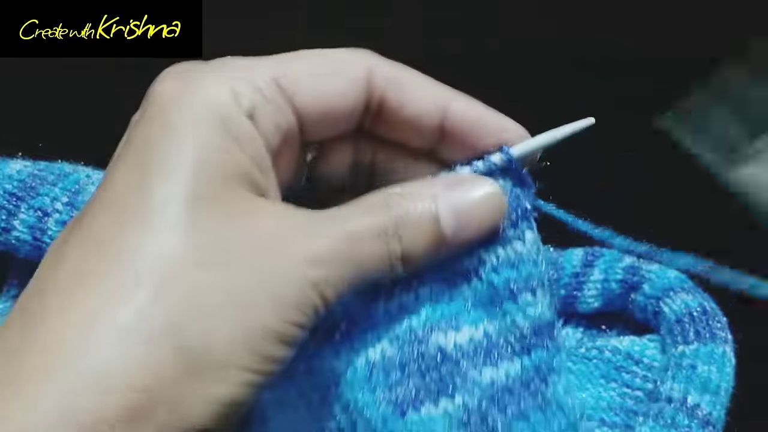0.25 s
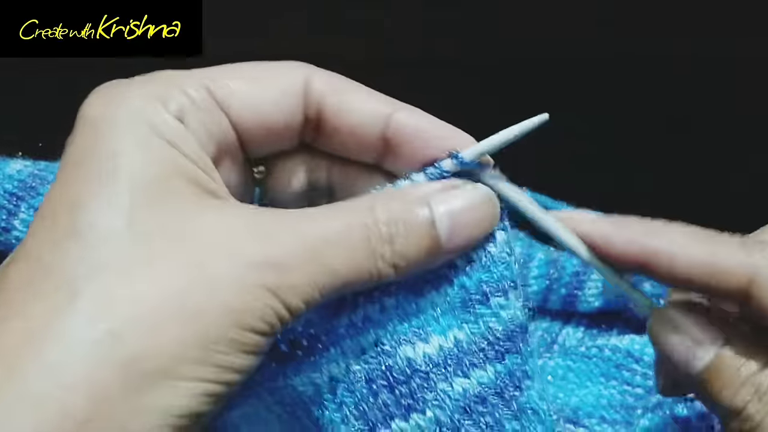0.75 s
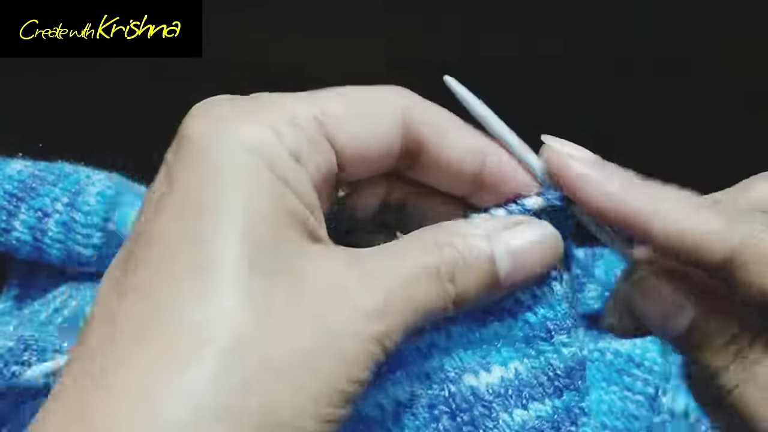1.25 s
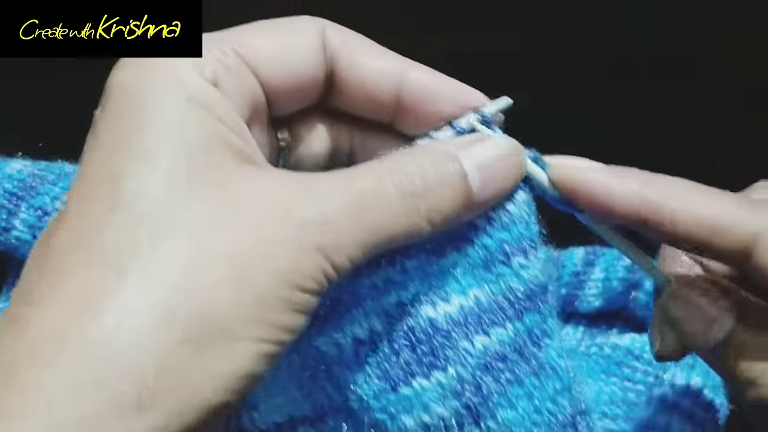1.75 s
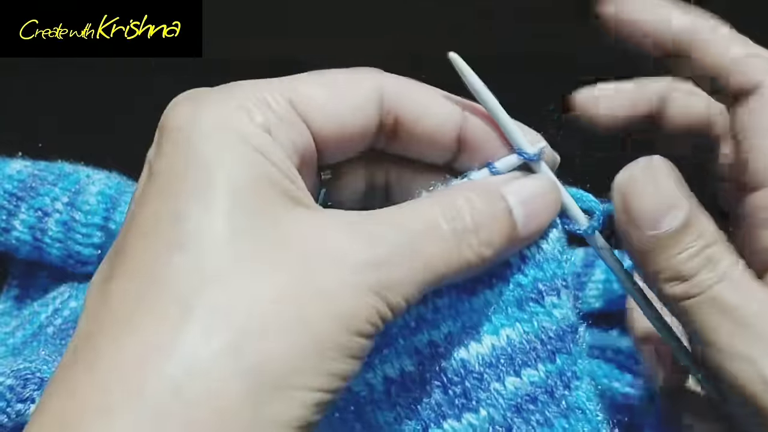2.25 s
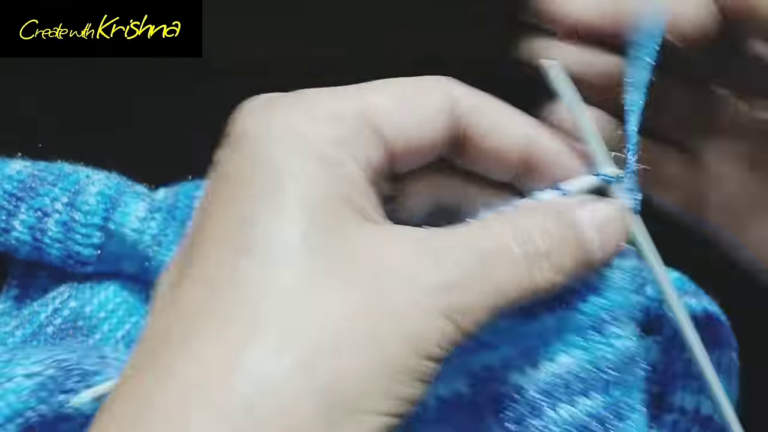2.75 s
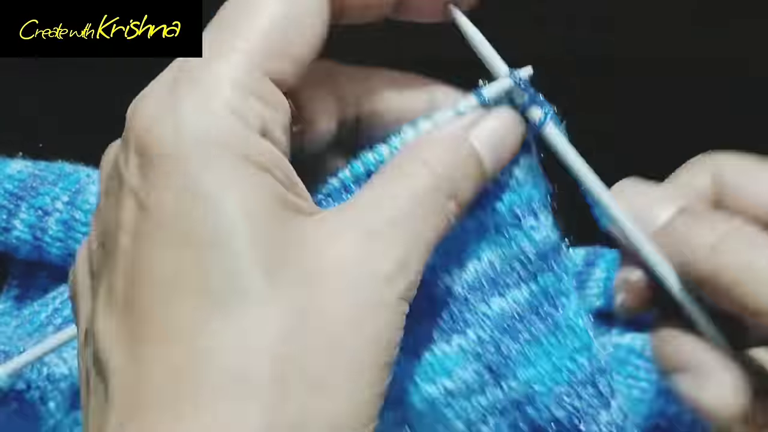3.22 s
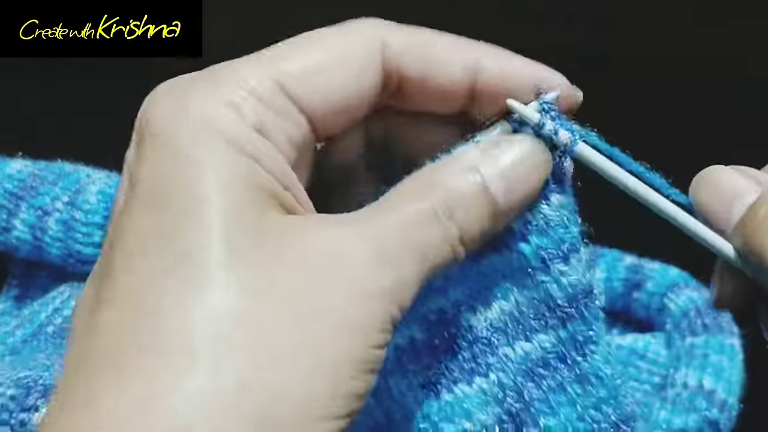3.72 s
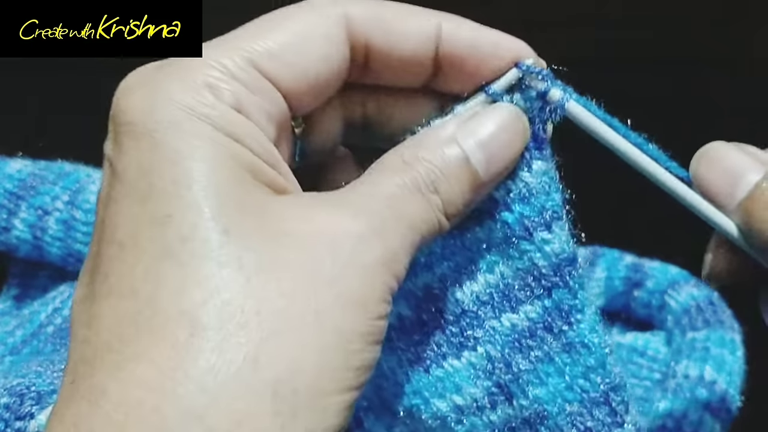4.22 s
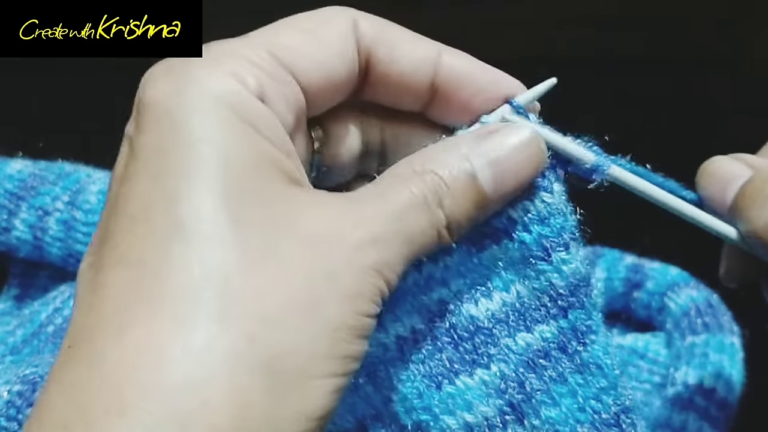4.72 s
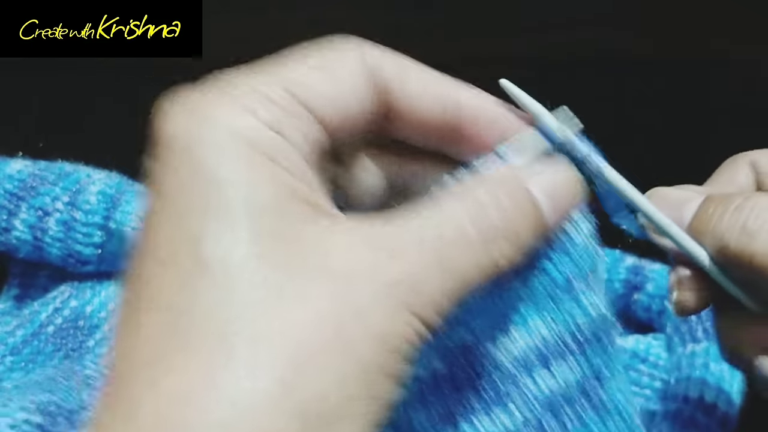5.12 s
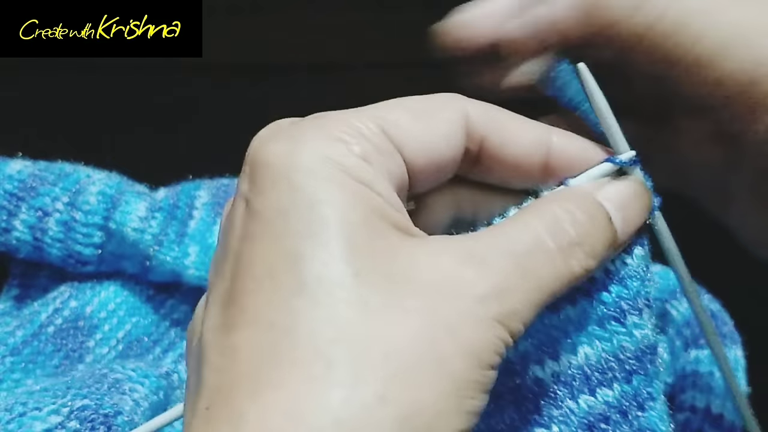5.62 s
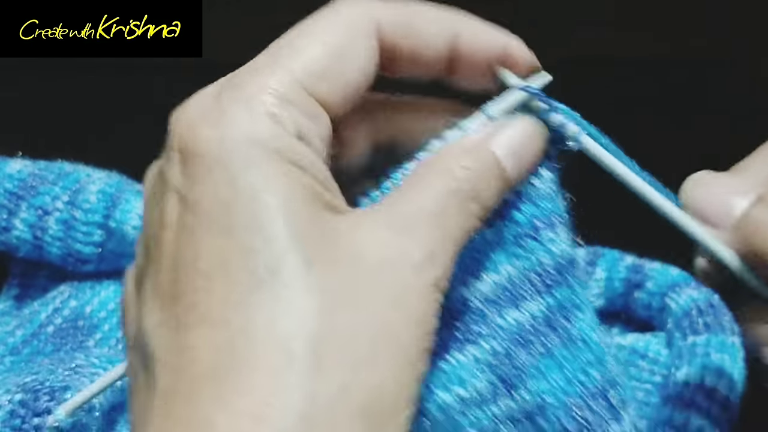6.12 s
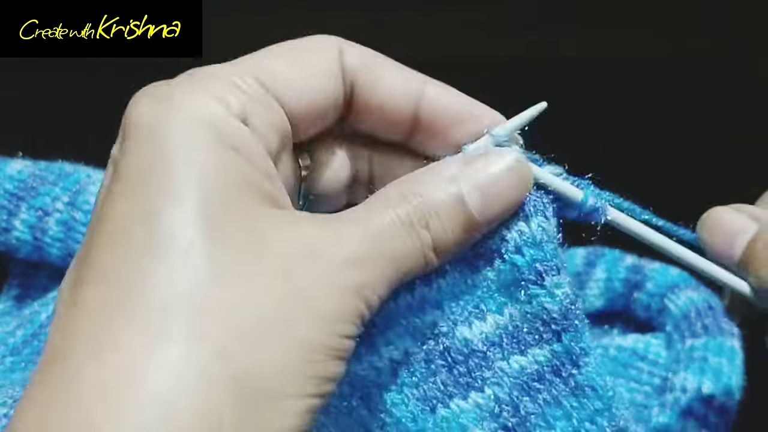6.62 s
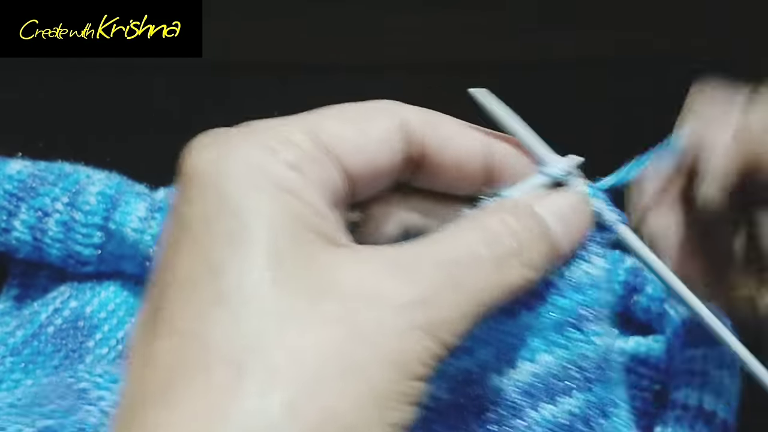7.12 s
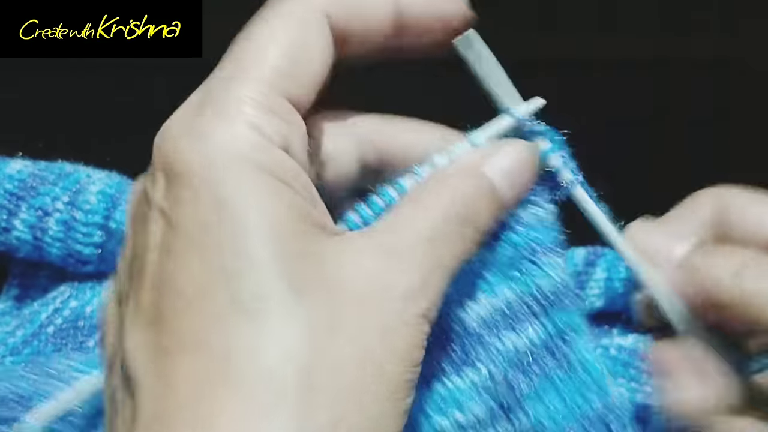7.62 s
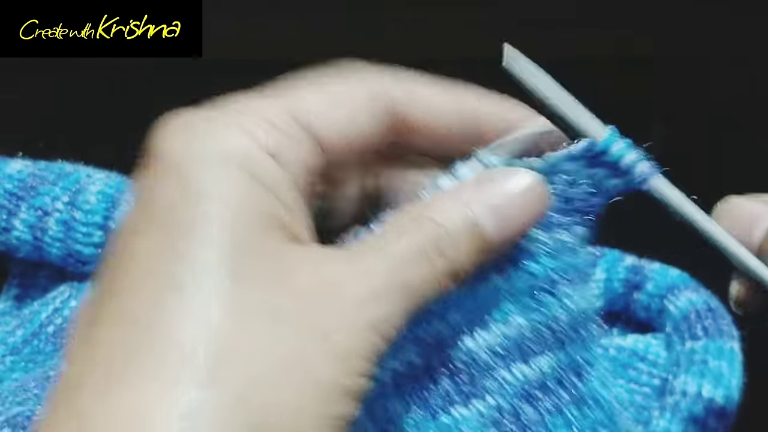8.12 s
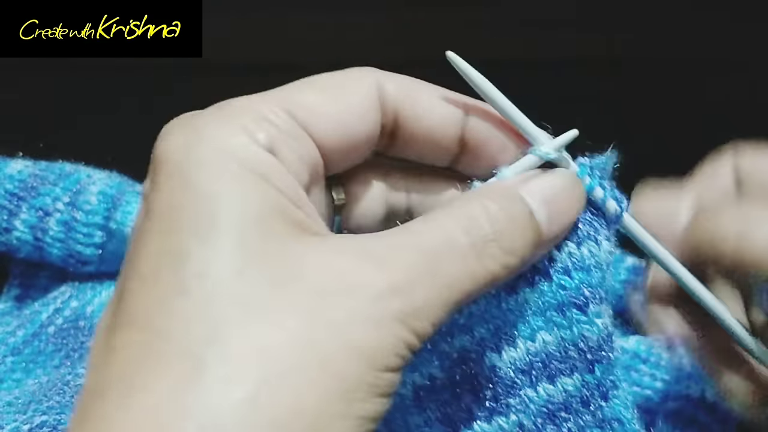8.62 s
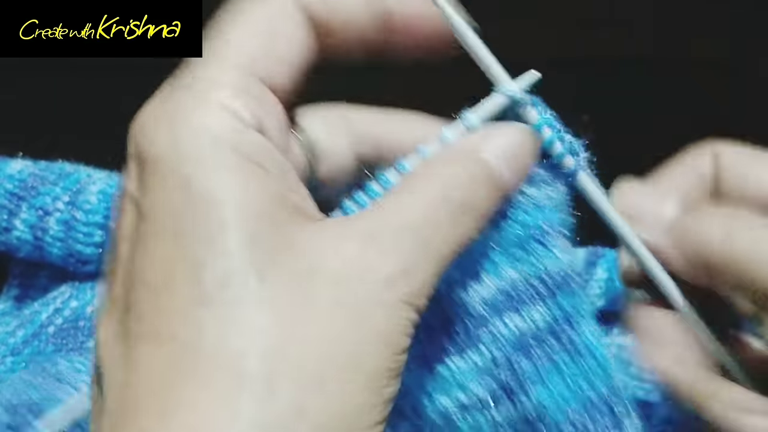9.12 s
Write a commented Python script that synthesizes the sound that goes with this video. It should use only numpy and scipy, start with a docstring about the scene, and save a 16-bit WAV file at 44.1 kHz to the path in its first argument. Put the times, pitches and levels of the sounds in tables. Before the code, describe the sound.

A steady, fluttering low motor hum fills a small room. Near the microphone and brighter on the left, knitting needles make tiny dry clicks and soft grainy swishes. One hard metallic knock rings and rattles briefly, followed by a short rising scrape. Afterwards come irregular ticks, a fainter catch and scrape, brisk slides and a rapid flurry of bright clicks.

```python
"""Metal knitting needles work slowly, close to the left port of a microphone in a small room.
The tips tick together (noise bursts and ringing tones) and slide through the yarn (grainy, coloured noise).
Once a needle's far end strikes something hard (fading tones, a crack, a thump), and it scrapes along it
(noise through sharp resonances, with a squeak).
Behind, a motor, probably a fan, hums and drones: wavering tones over coloured noise."""
import sys
import numpy as np
from scipy import signal
from scipy.fft import rfft, irfft, next_fast_len
from scipy.io import wavfile
from scipy.ndimage import map_coordinates

SR = 44100
rng = np.random.default_rng(int(sys.argv[2]) if len(sys.argv) > 2 else 0)


def waveform_to_disk(signal):
    """Save audio, clipped to [-1, 1], as 16-bit WAV at the path in sys.argv[1]."""
    frames = np.transpose(np.atleast_2d(signal))
    scaled = np.clip(frames, -1, 1) * 32767
    samples = np.round(scaled).astype(np.int16)
    wavfile.write(sys.argv[1], SR, samples)


N = 412776
TIME = np.arange(N) / SR  # seconds

# In all tables t60 is the time to fade by 60 dB; levels are settings before each layer's own gain.
# The motor's tones. Each row: pitch in Hz, level in dB, flutter per second, unsteady share from 0 to 1.
MOTOR_TONES = [(146.1, -64, 6, 0.08), (236.7, -71.5, 12, 0.7), (263.6, -69, 12, 1), (495, -80, 33, 0.94),
               (602.7, -70, 15, 0.6), (721, -79.5, 16, 0.48), (1210, -87, 35, 0.89)]
# The slowly wavering hum. Each row: time in seconds, level in dB.
HUM_LEVEL = [(0.0, -64), (0.36, -62), (0.49, -60), (1.09, -66), (1.41, -63), (2.34, -67), (2.61, -61.5),
             (3.18, -71), (3.6, -63), (3.86, -66), (4.14, -70), (4.3, -64.5), (5.68, -67.5), (6.13, -63),
             (6.28, -70), (6.78, -62.5), (7.43, -66.5), (7.82, -61), (8.03, -70), (8.63, -64.5),
             (8.94, -69), (9.36, -62)]
# The low rumble in the room. Each row: time in seconds, level in dB.
RUMBLE_LEVEL = [(0, -62), (.45, -56), (.72, -59), (1.05, -64), (1.6, -60), (3, -66), (3.9, -67.5),
                (4.5, -63), (5.3, -65.5), (6.5, -66.5), (7.65, -60.5), (8.2, -67), (9.3, -62.5)]
# Colours of the rumble, the drone and the hiss. Each row: frequency in Hz, strength in dB per Hz.
RUMBLE_COLOUR = [(12, -3), (30, -1), (54, -0.5), (66, 2.5), (80, -9.5), (120, -9.5), (220, -52.5)]
DRONE_COLOUR = [(90, -26.5), (150, -7.5), (175, -9.5), (200, -3.5), (220, -4), (280, -2.5), (315, -10),
                (420, -7.5), (530, -6), (660, -15), (800, -18.5), (1000, -21.5), (1400, -27), (2500, -58)]
HISS_COLOUR = [(500, -13), (1200, 0), (2000, 2), (5000, -0.5), (7000, -3), (9000, -9.5), (11000, -4.5),
               (13500, 0.5), (15400, -1.5), (15800, -24.5)]
# How alike the room noise is at both ports. Each row: frequency in Hz, likeness from 0 to 1.
LIKENESS = [(60, 0.83), (150, 0.47), (300, 0.71), (600, 0.035), (1200, 0.079), (4000, 0.04),
            (10000, 0.0503)]
# Needle sliding on needle and yarn. Each row: fastest moment in seconds, sizzle in dB, rasp in dB,
# length in seconds.
STROKES = [(.212, -63.5, -71.5, 0.11), (.717, -64, -76, .026), (0.797, -66, -71, 0.035),
           (0.967, -56, -66.5, 0.06), (1.185, -59, -66.5, 0.085), (1.223, -53.5, -64, 0.041),
           (1.816, -60, -72, .025), (2.102, -49.5, -66, 0.12), (2.666, -66, -73, 0.083),
           (2.818, -62, -74, 0.045), (3.1, -57, -64, 0.12), (3.295, -61.5, -73, 0.076),
           (3.543, -53, -67.5, 0.056), (4.023, -67, -76, .026), (4.572, -55, -67.5, 0.053),
           (4.9, -74, -77, 0.033), (5.072, -58, -66, .03), (5.141, -45, -63.5, 0.074),
           (5.948, -62, -68, 0.043), (6.14, -59.5, -74, 0.1), (6.897, -42.5, -64, 0.069),
           (7.031, -66, -75, .08), (7.602, -62, -66.5, 0.089), (7.692, -55, -76, .028),
           (7.72, -65, -72.5, 0.078), (8.514, -44.5, -69, 0.084), (8.614, -60.5, -66, 0.074),
           (9.131, -66, -74, 0.089), (9.21, -48, -69, 0.072), (9.317, -62, -70, 0.018)]
# Colours of the sizzle, the rasp and the loop dragging along the shaft.
# Each row: frequency in Hz, strength in dB per Hz.
SIZZLE_COLOUR = [(8800, -47.5), (9700, -18.5), (10700, -13.5), (11600, -7.5), (12500, -4), (13700, -3.5),
                 (14600, -2), (15400, -6.5), (15800, -33)]
RASP_COLOUR = [(900, -34), (2300, -4.5), (4000, -4), (6000, 0.5), (7400, -6), (8500, -2.5), (9500, -23)]
WOOL_COLOUR = [(1200, -23), (2000, -6.5), (2550, -1), (3200, -8), (5000, -8.5), (8000, -15), (10000, -28)]
# Tips touching. Each row: start in seconds, level in dB, body in dB relative to that level,
# t60 in seconds, note of the shaft at that grip in Hz.
TICKS = [(0.532, -43, -11, .012, 4300), (.602, -39.5, -9.5, 0.017, 4400), (.771, -56, -4, .015, 5400),
         (0.9346, -47, -8, 0.023, 7500), (.959, -48.5, -7, .012, 5500), (3.404, -61, -12, .01, 5800),
         (4.1348, -40.5, -12.5, .0093, 5800), (4.5271, -34.5, -26, 0.014, 5500), (4.712, -57, 2, .01, 2500),
         (4.7596, -35, -18.5, .0098, 6000), (5.0385, -32.5, -17, 0.011, 4400),
         (5.232, -62.5, 3, 0.016, 2540), (6.0628, -43, -15, 0.015, 7600), (6.081, -50, -18, .012, 5800),
         (6.092, -57, -18, .012, 5800), (6.149, -48, -16, .015, 5800), (6.6028, -38, -13, 0.0097, 5900),
         (6.859, -48, -16, .028, 6000), (7.598, -47, -19, .012, 5800), (7.603, -53, -16, .014, 5200),
         (7.626, -28.5, -27, 0.009, 6900), (7.635, -47, -22, .03, 5400), (7.6785, -34.5, -20.5, 0.02, 7760),
         (7.682, -44, -24, .012, 5200), (7.686, -46, -24, .012, 6400), (7.6889, -32, -31, 0.012, 5800),
         (7.6965, -44, -25, .012, 4400), (7.7, -41, -26, .01, 5800), (7.7943, -29, -17.5, 0.015, 5700),
         (8.349, -50.5, -7, 0.01, 5800), (8.4885, -41, -31, 0.05, 5800), (9.06, -55, -9, .025, 5800),
         (9.176, -45, -26, 0.04, 5800), (9.2453, -40, -24, 0.025, 5800), (9.346, -47, -12, .015, 5750)]
# Colours of a tick's bright top and its body. Each row: frequency in Hz, strength in dB per Hz.
TICK_TOP_COLOUR = [(8900, -26), (9800, -9.5), (10700, 0), (11800, 2), (13600, 11), (15200, 8), (16300, -9)]
TICK_BODY_COLOUR = [(500, -14), (1300, -1), (2200, -7), (2700, 3.5), (3500, -3.5), (4400, 2), (5200, 4),
                    (6000, 6), (7000, 6), (8000, 6), (9200, -6)]
# How much louder the tips are at the left port. Each row: frequency in Hz, difference in dB.
TIP_PAN = [(5000, 2), (8000, 0.5), (10000, 9), (12000, 18), (14000, 20.5)]
# Ringing tones of the struck needle. Each row: pitch in Hz, left level in dB, right level in dB,
# t60 in seconds.
NEEDLE_MODES = [(480, -44, -47, .08), (850, -46, -46, .04), (1630, -32, -32, .03), (1780, -33, -32, .03),
                (2380, -37, -35, .025), (2900, -32, -30, .028), (3634, -37, -43, .05), (4270, -52, -52, .1),
                (4620, -54, -54, .12), (5440, -42, -39, .13), (5480, -34, -29, .055), (5780, -36, -32, .05),
                (5850, -33, -33, .06), (5885, -37, -37, .13), (6148, -43, -45, .11), (6490, -37, -39, .09),
                (7208, -39, -39, .08), (8100, -33, -36, .05), (10330, -27, -43, .075),
                (11050, -31, -36, .05), (11180, -40, -48, .13), (11890, -20, -41, .06),
                (13540, -5.5, -33, .04), (13780, -21, -38, .015), (15200, -28, -40, .12)]
# Colour of the crack. Each row: frequency in Hz, strength in dB per Hz.
CRACK_COLOUR = [(50, -3), (200, -1), (450, -2), (850, -2.5), (1120, -4.5), (1600, 5), (2700, -2.5),
                (4300, -6.5), (6000, 3.5), (8000, -1.5), (9000, -5), (10500, 5.5), (12600, -2), (14000, 3),
                (15300, 5), (15900, -17)]
# Clusters of close tones in the needle's rattle. Each row: centre in Hz, width in Hz, level in dB.
RATTLE_CLUSTERS = [(1590, 350, -11.5), (2540, 520, -13), (3538, 300, -10), (4120, 180, -14),
                   (4780, 250, -9.5), (5590, 340, 5), (6536, 230, -3), (7190, 260, -4.5), (8070, 410, -3),
                   (10100, 490, -0.5), (11130, 280, 2), (12600, 360, 1), (13850, 340, -3),
                   (14950, 450, -0.5), (15500, 188, 4)]
# The furniture under the blow. Each row: pitch in Hz, level in dB, t60 in seconds.
FURNITURE_MODES = [(31, -44.5, .35), (52, -42, 0.24), (84, -48.5, 0.18), (177.3, -52.5, .13),
                   (216, -52.5, 0.12), (293.3, -51.5, 0.069)]
# The needle's end catching. Each row: start in seconds, level in dB, t60 in seconds,
# frequency in Hz above which the catch is dulled.
CATCHES = [(2.7695, -48, 0.043, 13000), (2.7832, -51, 0.1, 13000), (5.76, -48.5, .03, 1700),
           (5.7987, -54, 0.028, 2400)]
# Colour of a catch. Each row: frequency in Hz, strength in dB per Hz.
CATCH_COLOUR = [(1200, -2), (3000, -1), (8000, -0.5), (11000, 1), (15000, -1)]
# The needle's end skidding. Each row: start in seconds, length in seconds, level at the end in dB.
SCRAPES = [(2.844, 0.278, -59), (5.85, 0.097, -64.5)]
# Resonances of the skid. Each row: centre in Hz, width in Hz, level in dB.
SKID_RESONANCES = [(1280, 290, 5.5), (1620, 94, 6.5), (2470, 90, 9), (2850, 300, 7), (3180, 140, 0),
                   (3620, 380, -2), (5410, 110, 7), (5840, 150, 4), (6320, 120, 7), (7220, 140, 5),
                   (7450, 130, 5), (10860, 270, -10), (11890, 90, 11.5), (13540, 110, 11.5),
                   (15240, 120, 10)]
# How much louder the needle's end is at the left port. Each row: frequency in Hz, difference in dB.
SKID_PAN = [(5000, 0), (9000, 3.5), (14000, 11.5)]
# How long the room rings. Each row: frequency in Hz, t60 in seconds.
ROOM_FADE = [(100, 0.31), (1000, 0.18), (6000, 0.34), (14000, 0.26)]

HUM_HZ, HUM_DB = 100.5, 1  # pitch, dB over the hum table
BOOM_HZ, BOOM_DB, BOOM_FLUTTER = 96.8, -70, 9  # narrow boom beating with the hum; flutter per second
RISE_SHARE = 0.512  # part of a stroke spent speeding up
FOLLOW_S, FOLLOW_DB, FOLLOW_LENGTH_S = .14, -25.5, .11  # soft drag of the loop after each stroke
TIP_HZ, TIP_SPREAD = 13780, 0.017  # the tips' own ping, and its random share of change per touch
STRIKE_S = 2.4757  # the hard blow on the needle's end
SETTLE_S, PRESS_DB_PER_S, LIFT_S = 0.048, 21, 0.013  # a skid sets in, grows with pressing, lifts off
SQUEAK_HZ, SQUEAK_WIDTH_HZ, SQUEAK_DB = 2900, 440, -11.5  # dB over the skid's friction
SAG_HZ, SLOWING_S = 400, .045  # how far the squeak sinks, and over how long, as the skid slows
TOP_HZ = 16100  # band limit


def amp(db):
    """Turn decibels into gain."""
    return 10 ** (np.asarray(db) / 20)


def unit(x):
    """Scale x to an rms (average strength) of 1."""
    return x / np.sqrt(np.mean(x ** 2) + 1e-20)


def along(points, hz):
    """Read a value between (Hz, value) points, with pitch on a log axis."""
    f, v = np.transpose(points)
    return np.interp(np.log(hz + 1), np.log(f + 1), v)


def wobble(rate):
    """A smooth random curve with about `rate` random points a second."""
    knots = rng.standard_normal(int(N * rate / SR) + 4)
    steps = np.linspace(0, len(knots) - 1, 8 * len(knots))
    return unit(np.interp(TIME * rate, steps, map_coordinates(knots, [steps])))


def filtered(x, response):
    """Strengthen or weaken each frequency of x by response(hz)."""
    size = next_fast_len(N + 8192)
    spectrum = rfft(x, size) * response(np.fft.rfftfreq(size, 1 / SR))
    return irfft(spectrum, size)[..., :N]


def noise(colour):
    """Two unrelated coloured noises, together at rms 1."""
    white = rng.standard_normal((2, N))
    return unit(filtered(white, lambda hz: amp(along(colour, hz))))


def diffuse(colour):
    """Room noise: alike at both ports in the bass, nearly unrelated in the treble."""
    def mix(hz):
        turn = np.arccos(np.clip(along(LIKENESS, hz), -1, 1)) / 2
        return np.array([np.cos(turn), np.sin(turn)])

    mid, side = filtered(noise(colour), mix)
    return unit(np.array([mid + side, mid - side]))


def shaded(x, pan):
    """The right port faces away and loses mostly treble."""
    return filtered(x, lambda hz: np.array([np.ones_like(hz), amp(-along(pan, hz))]))


def swells(rows):
    """Envelope of rubbing strokes (s, dB, length): each swells and fades, 10 dB down at both ends."""
    power, t = 0, TIME[::16]
    for s, db, length in rows:
        away = np.abs(t - s) / (length * np.where(t < s, RISE_SHARE, 1 - RISE_SHARE))
        power = power + amp(db - 10 * np.minimum(away, 20) ** (3 / 2)) ** 2
    return np.interp(TIME, t, np.sqrt(power))


def burst(s, hold, t60):
    """Envelope of a contact: a quick rise at s, then fading from `hold` seconds after s."""
    start = int(s * SR)
    t = TIME[:min(SR // 2, N - start)]
    envelope = np.zeros(N)
    rise = np.minimum(t / 0.00058, 1)
    envelope[start:start + len(t)] = rise * amp(-60 * np.maximum(t - hold, 0) / t60)
    return envelope


def patchy(x, depth_db, width_hz, life):
    """Let patches of pitch come and go over `life` seconds, as when fingers shift their grip."""
    hz, t, z = signal.stft(x, SR, nperseg=256)
    knots = rng.standard_normal((int(hz[-1] / width_hz) + 2, int(t[-1] / life) + 2))
    grid = np.meshgrid(hz / width_hz, t / life, indexing="ij")
    field = map_coordinates(knots, grid, order=2)
    return unit(signal.istft(z * amp(depth_db * field), SR, nperseg=256)[1][..., :N])


def resonances(table):
    """Response of a set of (Hz, width Hz, dB) resonances, with deep valleys between them."""
    def response(f):
        return sum(amp(db) * (f * width) ** 2 / ((centre * centre - f * f) ** 2 + (f * width) ** 2)
                   for centre, width, db in table)
    return response


def room(x):
    """The walls' answer: x smeared by fading noise, each frequency dying at its own speed."""
    hz, t, z = signal.stft(rng.standard_normal((2, SR // 2)), SR, nperseg=256)
    fade = amp(-60 * t / along(ROOM_FADE, hz)[:, None])
    tail = signal.istft(z * fade, SR, nperseg=256)[1]
    return signal.fftconvolve(x[None], tail / np.linalg.norm(tail[0]), axes=1)[:, :N]


def motor(drone_db=-62, hiss_db=-70.5, spread=0.325):
    """Mains hum and fluttering tones over the low noise of moving air and a faint hiss."""
    tones = np.zeros((2, N))
    for hz, db, flutter, share in MOTOR_TONES:
        sway = 1 - share + share * (wobble(flutter) + 1j * wobble(flutter))
        # standing waves put the two ports out of step
        ports = spread * np.sqrt(hz / 300) * np.array([[1], [-1]])
        wave = np.exp(1j * (2 * np.pi * hz * TIME + ports))
        tones = tones + amp(db) * unit(np.real(sway * wave))
    boom_sway = wobble(BOOM_FLUTTER) + 1j * wobble(BOOM_FLUTTER)
    boom = unit(np.real(boom_sway * np.exp(2j * np.pi * BOOM_HZ * TIME)))
    hum_level = amp(HUM_DB + np.interp(TIME, *np.transpose(HUM_LEVEL)))
    hum = hum_level * unit(np.sin(2 * np.pi * HUM_HZ * TIME))
    rumble = amp(np.interp(TIME, *np.transpose(RUMBLE_LEVEL))) * diffuse(RUMBLE_COLOUR)
    air = amp(drone_db) * diffuse(DRONE_COLOUR) + amp(hiss_db) * diffuse(HISS_COLOUR)
    left_right = amp([[.7], [-.7]])  # dB
    return (tones + hum) * left_right + rumble + amp(BOOM_DB) * boom + air


def slides(fibres_db=-74.0, stir_db=3, wool_db=-8):
    """Metal slides on metal and wool in tiny slips; the loop drags softly after and fibres stir."""
    sizzles = [(s, db, length) for s, db, rasp_db, length in STROKES]
    rasps = [(s, rasp_db, length) for s, db, rasp_db, length in STROKES]
    follows = [(s + FOLLOW_S, db + FOLLOW_DB, FOLLOW_LENGTH_S) for s, db, length in sizzles]
    drags = [(s + FOLLOW_S, db + wool_db, FOLLOW_LENGTH_S) for s, db, length in rasps]
    slips = unit(amp(3 * wobble(900) + 1.7 * wobble(110)))
    pace = np.minimum(TIME / 7, 1)  # stirring and wool drag grow as the hands get going, over 7 s
    stir = amp(fibres_db + stir_db * wobble(10)) * pace
    pair = np.array([noise(SIZZLE_COLOUR), noise(RASP_COLOUR)])
    bright, dull = patchy(pair, depth_db=3.8, width_hz=520, life=.025)
    sizzle = (swells(sizzles + follows) + stir) * bright
    rasp = swells(rasps) * dull
    wool = pace * swells(drags) * noise(WOOL_COLOUR)
    return shaded(slips * (sizzle + rasp + wool), TIP_PAN)


def ticks(hold=0.002, top_db=-4.5, body_db=-7, tail_db=-25, snap_db=-2, snap_t60=0.0022,
          note_db=-10, tip_db=-6, ring_t60=0.012):
    """The tips meet, ping and sound a note of the shaft; fingers and wool damp them quickly."""
    top, body, rings = np.zeros((3, N))
    for s, db, rel_db, t60, note_hz in TICKS:
        near = slice(int(s * SR), int(s * SR) + SR // 4)
        snap = amp(snap_db) * burst(s, hold / 2, snap_t60)[near]
        contact = amp(db) * (burst(s, hold, t60)[near] + snap)
        top[near] += contact + amp(db + tail_db) * burst(s, hold, 0.12)[near]
        body[near] += contact * amp(rel_db)
        turn = 2 * np.pi * (TIME[near] - s)
        tip_hz = TIP_HZ * (1 + TIP_SPREAD * rng.standard_normal())
        note = amp(rel_db + note_db) * np.sin(note_hz * turn)
        tip = amp(tip_db) * np.sin(tip_hz * turn)
        rings[near] += amp(db) * burst(s, hold, ring_t60)[near] * (note + tip)
    ping = patchy(noise(TICK_TOP_COLOUR), depth_db=3, width_hz=600, life=.08)
    knock = noise(TICK_BODY_COLOUR)
    return shaded(amp(top_db) * top * ping + amp(body_db) * body * knock + rings, TIP_PAN)


def strike(contact=0.00358, build=0.001, sustain=0.0092, crack_db=-24, clatter_db=-43,
           clatter_t60=0.23, grip=0.2505):
    """The needle's end hits a hard surface, which cracks and clatters and sets the needle ringing."""
    t = np.maximum(TIME - STRIKE_S, 0)
    ringing = (t > 0) & (t < .4)
    ring, shake = np.zeros((2, N)), wobble(180)
    for hz, left_db, right_db, t60 in NEEDLE_MODES:
        hold = sustain * hz / 13500  # high modes are fed for longer
        # the loose grip roughens each mode
        roughness = grip * np.roll(shake, rng.integers(N))[ringing]
        phase = 2 * np.pi * hz * t[ringing] + roughness
        # short waves reach the ports out of step
        ports = np.array([[0], [np.pi]]) * min(hz / 7000, 1) ** 2
        level = amp([[left_db], [right_db]]) * burst(STRIKE_S, hold, t60)[ringing]
        ring[:, ringing] += level * np.sin(phase + ports)
    near, far = noise(CRACK_COLOUR)
    crack_ports = np.array([near, 0.59 * near + 0.21 * far])
    crack = amp(crack_db) * burst(STRIKE_S, contact, 0.027) * crack_ports
    # the surface's many weak modes
    surface = patchy(noise(CRACK_COLOUR), depth_db=4.5, width_hz=250, life=.3)
    clatter = amp(clatter_db) * burst(STRIKE_S, contact, clatter_t60) * surface
    return ring * (1 - np.exp(-t / build)) + shaded(crack + clatter, SKID_PAN)


def rattle(hold=0.0028, first_db=-19.0, first_t60=0.028, tail_db=-37.5, tail_t60=.19,
           t60_spread=.25, count=64):
    """The needle buzzes on the surface, then rings in weak modes, each dying at its own speed."""
    response = resonances(RATTLE_CLUSTERS)
    clusters = unit(filtered(rng.standard_normal((2, N)), response))
    buzz = amp(first_db) * burst(STRIKE_S, hold, first_t60) * clusters
    # one random pitch in each of `count` equal steps
    hz = 1400 + 14100 * (np.arange(count) + rng.random(count))[:, None] / count
    size = response(hz) * amp(2.5 * rng.standard_normal((count, 1)))
    t60 = tail_t60 * np.exp(t60_spread * rng.standard_normal((count, 1)))
    t = TIME[:SR // 4]
    modes = size / np.linalg.norm(size) * amp(-60 * t / t60) * np.exp(2j * np.pi * hz * t)
    at_ports = np.sqrt(2) * np.exp(2j * np.pi * rng.random((2, count)))
    start = int(STRIKE_S * SR)
    tail = np.zeros((2, N))
    tail[:, start:start + len(t)] = np.real(at_ports @ modes) * np.minimum(t / hold, 1)
    return shaded(buzz + amp(tail_db) * tail, SKID_PAN)


def thump(hold=.012):
    """The blow jolts the furniture, which booms briefly in low fading tones."""
    t = TIME - STRIKE_S
    boom = np.zeros(N)
    for k, (hz, db, t60) in enumerate(FURNITURE_MODES):
        sign = (-1) ** k  # neighbouring tones start in opposite directions
        boom += sign * amp(db) * burst(STRIKE_S, hold, t60) * np.sin(2 * np.pi * hz * t)
    return boom * amp([[2], [-3]])  # dB at left and right


def skidding():
    """Level of the skids, growing as the hand presses on, and how far each has slowed (0-1)."""
    drag, sag = np.zeros(N), np.zeros(N)
    for s, length, db in SCRAPES:
        left = s + length - TIME  # seconds to go
        touching = np.clip((TIME - s) / SETTLE_S, 0, 1) * np.clip(1 + left / LIFT_S, 0, 1)
        drag += amp(db - PRESS_DB_PER_S * np.clip(left, 0, length)) * touching
        sag += np.clip(1 - left / SLOWING_S, 0, 1) * (touching > 0)
    return drag, sag


def scrapes(wash_db=-13, catch_wash_db=-7, catch_hold=0.0011):
    """The needle's end catches, then skids: uneven slips through its resonances, with a hoarse squeak."""
    def body(floor_db):
        """The resonances over a flat floor."""
        return lambda f: amp(floor_db) * (f > 1000) * (f < 15500) + resonances(SKID_RESONANCES)(f)

    slips = amp(2.6 * wobble(600) + 1.2 * wobble(70))
    rubbing = patchy(rng.standard_normal((2, N)), depth_db=3.2, width_hz=300, life=.06)
    friction = unit(filtered(rubbing * slips, body(wash_db)))
    drag, sag = skidding()
    hoarseness = wobble(SQUEAK_WIDTH_HZ) + 1j * wobble(SQUEAK_WIDTH_HZ)
    turns = np.cumsum(SQUEAK_HZ - SAG_HZ * sag) / SR
    squeak = unit(np.real(hoarseness * np.exp(2j * np.pi * turns)))
    skid = drag * (friction + amp(SQUEAK_DB) * squeak)
    snag = unit(filtered(noise(CATCH_COLOUR), body(catch_wash_db)))
    catches = np.zeros((2, N))
    for s, db, t60, dull_hz in CATCHES:
        dulled = signal.lfilter(*signal.butter(1, dull_hz, fs=SR), snag)
        catches += amp(db) * burst(s, catch_hold, t60) * dulled
    return shaded(skid + catches, SKID_PAN)


def scene():
    """Needles up close, a little of the room, the motor behind."""
    needles = slides() + ticks() + strike() + rattle() + thump() + scrapes()
    echo = amp(-16.5) * room(needles[1]) + amp(-35.5) * room(needles[0])
    return needles + echo + motor()


def record(dry):
    """The recorder keeps almost nothing above its band limit."""
    return filtered(dry, lambda hz: 1 / (1 + (hz / TOP_HZ) ** 160))


dry = scene()
out = record(dry)
waveform_to_disk(out)
```